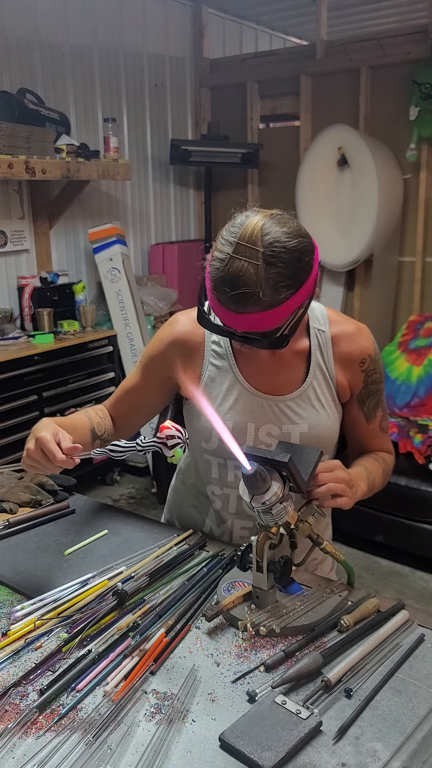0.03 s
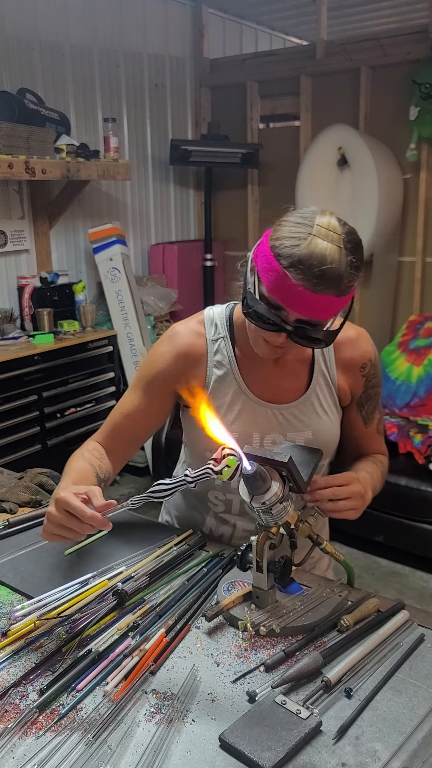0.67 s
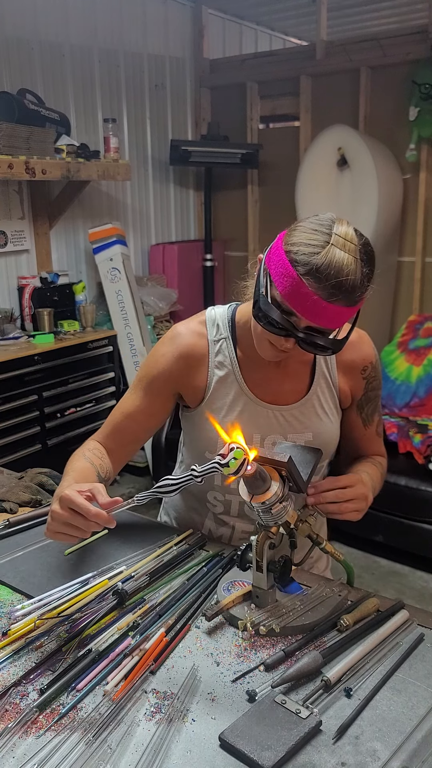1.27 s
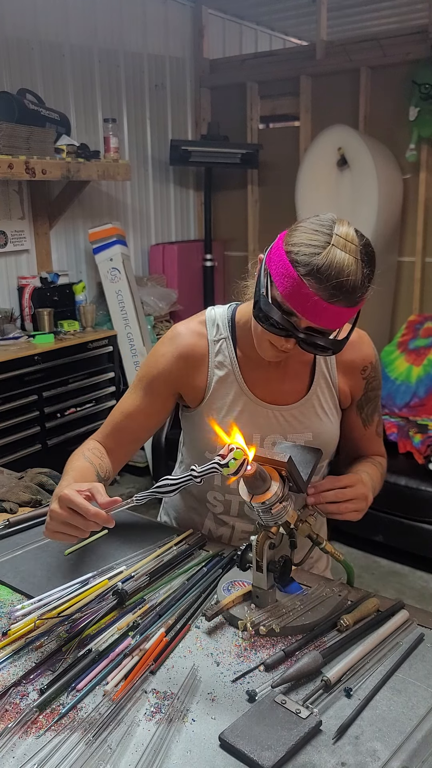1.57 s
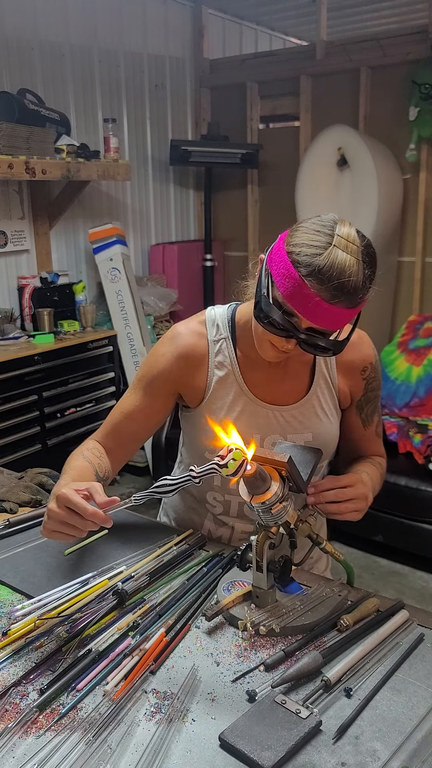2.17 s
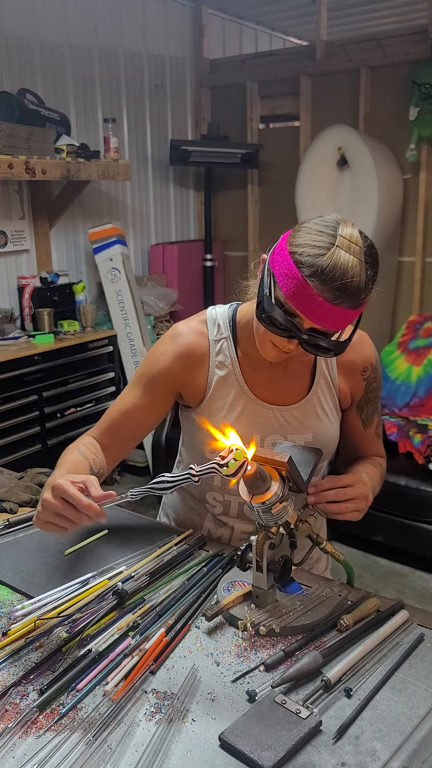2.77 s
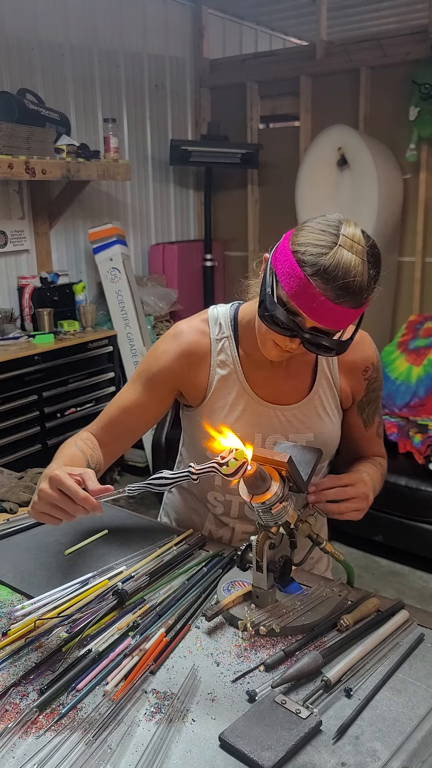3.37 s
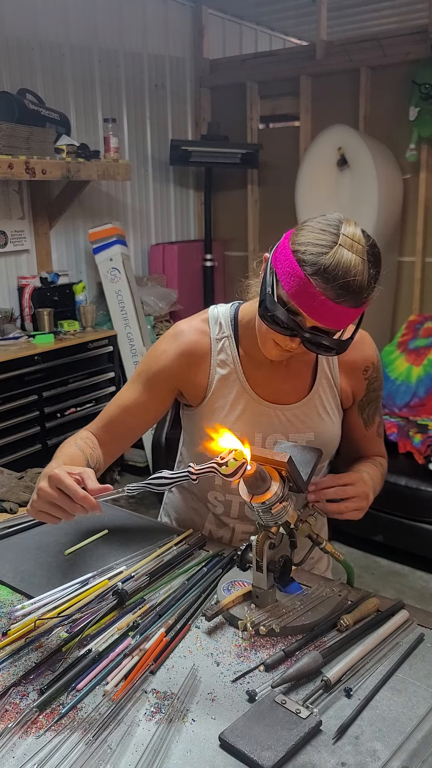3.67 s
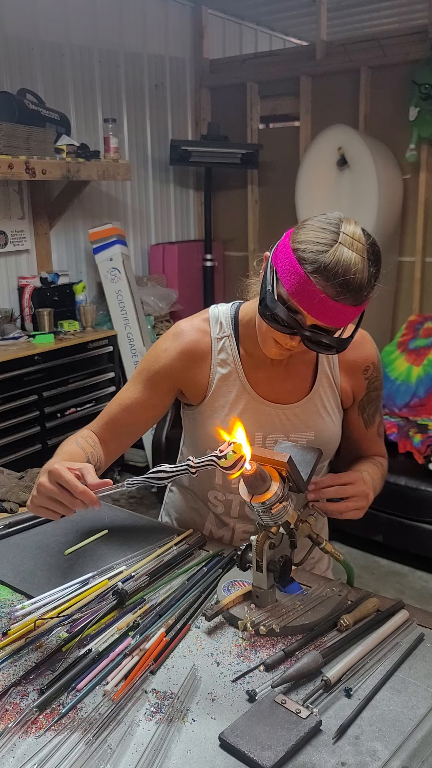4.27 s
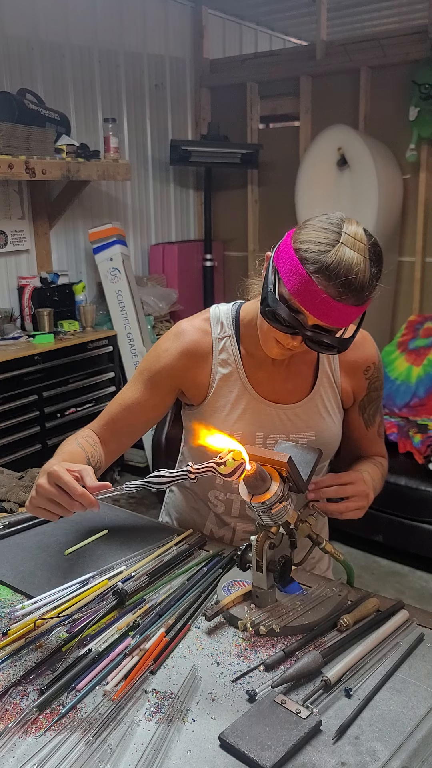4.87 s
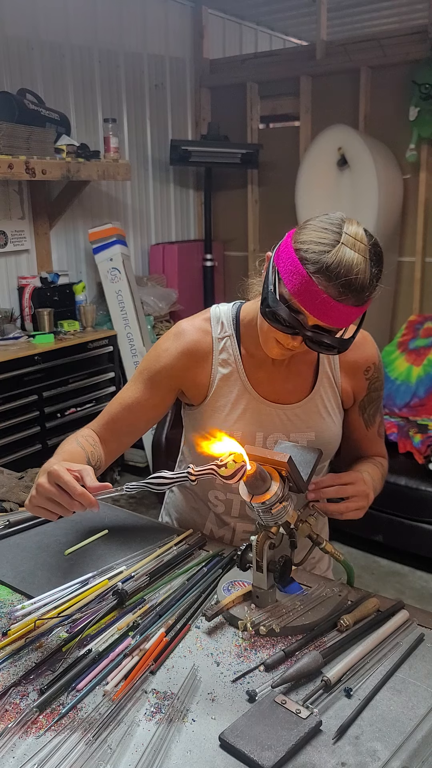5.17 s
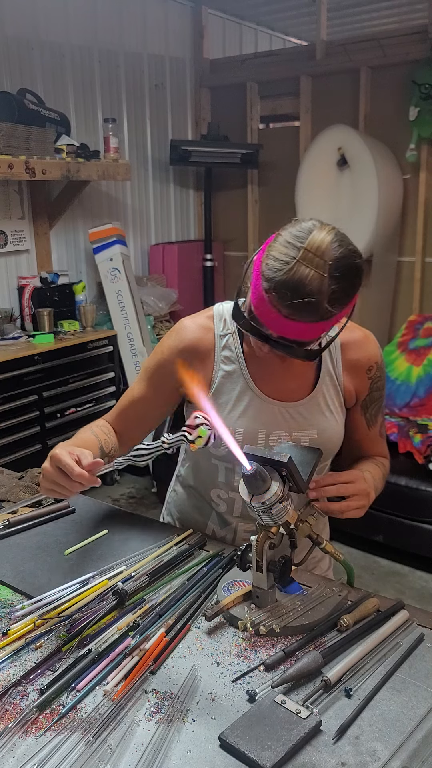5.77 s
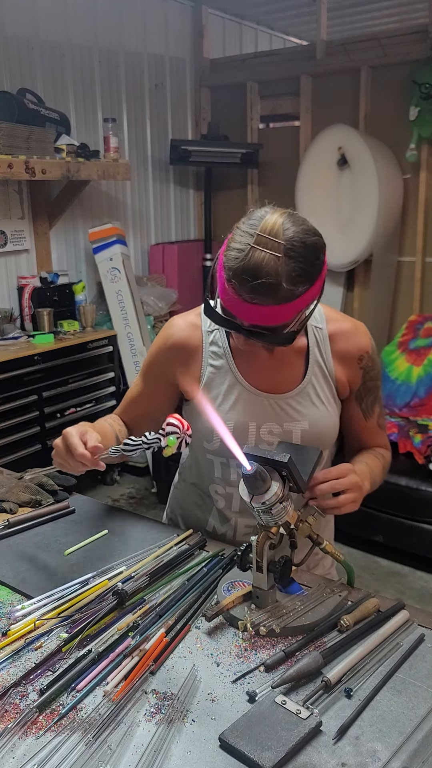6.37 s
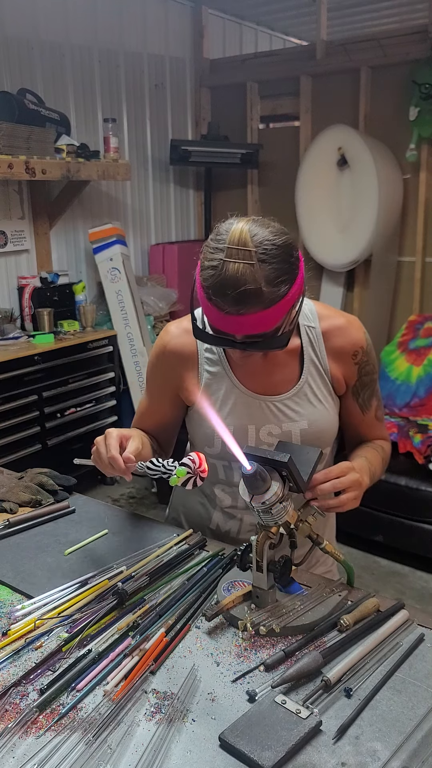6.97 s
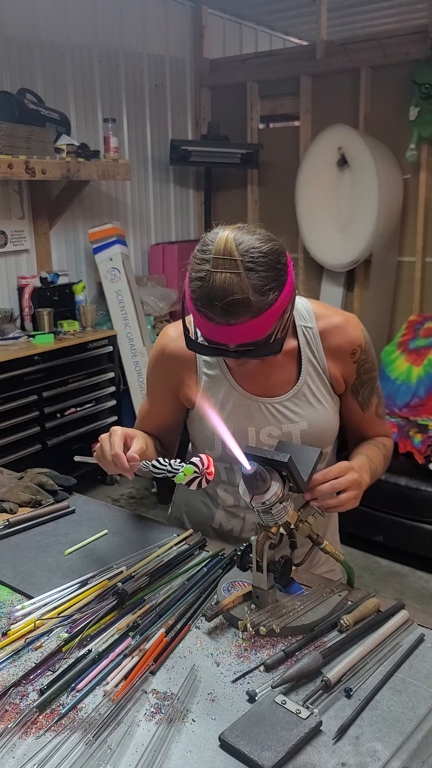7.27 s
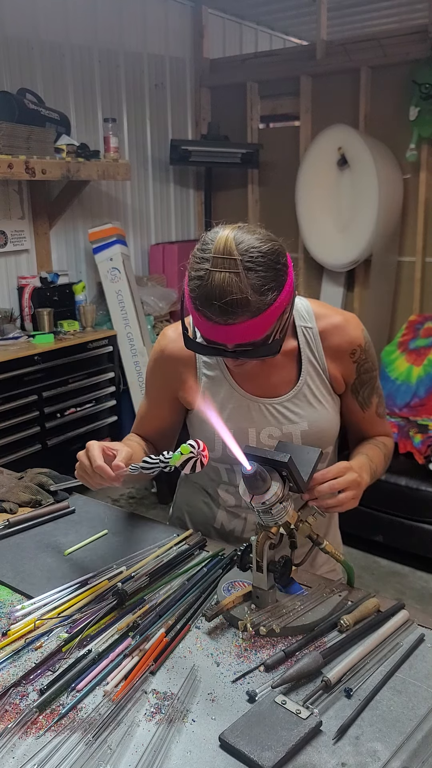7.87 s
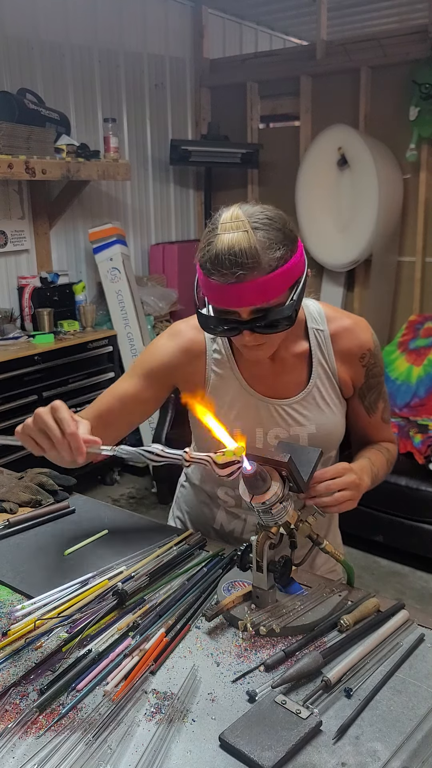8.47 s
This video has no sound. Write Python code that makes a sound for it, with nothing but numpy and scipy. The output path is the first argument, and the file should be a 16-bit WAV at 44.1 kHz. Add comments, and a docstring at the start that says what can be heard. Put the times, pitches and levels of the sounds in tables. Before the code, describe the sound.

Steady gas torch hiss and low roar in a small workshop, dulling as glass is heated, then brightening again over a faint fan hum.

```python
"""A bright hiss over a low roar: a glassworker's torch burns in a small workshop.
The hiss is the rushing gas jet. Glass held in the flame spreads the jet out, so the hiss turns softer
and duller, and the jet whistles breathily on the glass. The roar is the burning gas, which sets the
space round the bench ringing. The flame gives a few tiny spits, ventilation fans hum behind it all,
and there is one soft knock on wood."""
import sys
import numpy as np
from scipy import signal
from scipy.fft import rfft, irfft, next_fast_len
from scipy.io import wavfile
from scipy.ndimage import uniform_filter1d, map_coordinates

SR = 44100
rng = np.random.default_rng(int(sys.argv[2]) if len(sys.argv) > 2 else 0)


def wav_record(signal):
    """Record a signal, one row per channel, as 16-bit PCM in the file named by sys.argv[1]."""
    frames = np.transpose(np.atleast_2d(signal))
    bounded = np.clip(frames, -1, 1)
    # unit amplitude maps onto the largest positive 16-bit level
    quanta = np.round(bounded * 32767).astype(np.int16)
    wavfile.write(sys.argv[1], SR, quanta)


N = 380141


def amp(db):
    """Turn decibels into a number to multiply by."""
    return 10 ** (np.asarray(db) / 20)


def unit(x):
    """Scale a signal so that its average strength (rms) is 1."""
    return x / np.sqrt(np.mean(x ** 2) + 1e-20)


def along(points, hz):
    """Read between (Hz, value) points, with all octaves equally wide."""
    pitches, values = np.transpose(points)
    return np.interp(np.log(hz + 1), np.log(pitches + 1), values)


def curve(rows):
    """Join (seconds, value) rows with straight lines, one value per sample."""
    return np.interp(np.arange(N) / SR, *zip(*rows))


def wobble(rate):
    """A smooth curve through `rate` random values a second."""
    return map_coordinates(rng.standard_normal(int(N * rate / SR) + 4), [np.arange(N) * rate / SR])


def filtered(x, response):
    """Turn each frequency up or down as response(hz) says."""
    size = next_fast_len(N + SR // 2)
    return irfft(rfft(x, size) * response(np.fft.rfftfreq(size, 1 / SR)), size)[..., :N]


def highs(x, above_hz, steepness=8):
    """Keep the part of a sound above a given frequency."""
    return filtered(x, lambda hz: hz ** steepness / (hz ** steepness + above_hz ** steepness))


def rush(colour):
    """The noise of swirling gas, shaped by (Hz, dB) points."""
    return unit(filtered(rng.standard_normal(N), lambda hz: amp(along(colour, hz))))


def resonance(hz, centre, width):
    """How something that rings at one pitch responds to each frequency."""
    return 1j * hz * width / (centre ** 2 - hz ** 2 + 1j * hz * width)


def panned(balance_db):
    """Two gains with constant total power; a positive balance favours the first (left)."""
    gains = amp(balance_db * np.array([[.5], [-.5]]))
    return gains / np.sqrt(np.mean(gains ** 2, axis=0))


def wandering(x, sway_s):
    """A path that slowly lengthens and shortens bends every pitch a little up and down."""
    return map_coordinates(x, [np.arange(N) + sway_s * SR * wobble(2)], order=5, mode="reflect")


def workshop(x, near_t60, near_db, far_t60, far_db):
    """Add near echoes off the bench and far ones off the walls; t60 is the seconds to fade by 60 dB."""
    t = np.arange(SR // 2) / SR
    fades = amp(-60 * t / np.array([near_t60, far_t60])[:, None, None])
    near, far = rng.standard_normal((2, 2, len(t))) * fades
    echoes = amp(near_db) * near / np.linalg.norm(near[0]) + amp(far_db) * far / np.linalg.norm(far[0])
    echoes[:, 0] += 1  # the direct sound
    ripples = rfft(echoes)
    # take out what the two sides share, then even out the broad colour: only fine ripples stay
    broad = lambda v: uniform_filter1d(v, size=110)
    shared = broad(np.real(ripples[1] * ripples[0].conj())) / broad(np.abs(ripples[0]) ** 2)
    ripples[1] -= ripples[0] * shared
    ripples /= np.sqrt(broad(np.abs(ripples) ** 2))
    lead = SR // 100
    response = np.roll(irfft(ripples), lead, axis=1)
    padded = np.pad(x, (len(t), lead), mode="wrap")
    return signal.fftconvolve(padded[None], response, axes=1)[:, len(t) + lead:][:, :N]


def ventilation(drift_rad, waver_db):
    """Two fans turn at slightly different speeds, so they throb over the mains hum."""
    # The two fans and the mains. Each row: pitch in Hz, level in dB.
    motors = [(57.5, -48.5), (61.4, -44.5), (120, -42.5)]
    t = np.arange(N) / SR
    hum = 0
    for hz, db in motors:
        strength = np.sqrt(2) * amp(db + waver_db * wobble(3.8))
        hum += strength * np.sin(2 * np.pi * (hz * t + rng.random()) + drift_rad * wobble(1.8))
    return hum * amp([[-.7], [.7]])  # a little to the right


def knock(t60, contact_db):
    """A light knock makes the wooden bench ring: a firm contact, a short rattle and one rebound."""
    # The knock and its rebound. Each row: start in seconds, strength in dB.
    hits = [(4.432, -19), (4.452, -25)]
    # How the wood rings. Each row: pitch in Hz, width in Hz, relative level in dB.
    wood = [(560, 220, -4), (790, 260, 0), (970, 220, 0), (1330, 220, -3), (1650, 300, -8), (3100, 600, -4)]
    t = np.arange(N) / SR
    rattle_level = sum(amp(db - 60 * np.abs(t - s) / t60) * (t > s) for s, db in hits)
    blow = rng.standard_normal(N) * rattle_level
    for s, db in hits:
        blow[round(s * SR)] += amp(db + contact_db)
    ringing = lambda hz: sum(amp(db) * resonance(hz, centre, width) for centre, width, db in wood)
    return workshop(filtered(blow, ringing), near_t60=0.037, near_db=-4, far_t60=0.25, far_db=-2)


def roar(on_glass, mid_db, side_db, ring_db, calming_db, shortening_db):
    """Burning gas rumbles and rings round the bench; glass shortens the flame and calms its top."""
    # The rumble both ears share. Each row: frequency in Hz, relative level in dB.
    mid_colour = [(25, -21), (50, -7.5), (100, -0.5), (135, -5.5), (175, -13.5), (240, -7), (320, -7.5),
                  (420, -6.5), (540, -18), (720, -13.5), (1000, -26.5), (1200, -11.5), (2000, -23),
                  (3500, -23)]
    # The rumble that is opposite in the two ears. Each row: frequency in Hz, relative level in dB.
    side_colour = [(25, -28), (60, -12), (140, -16), (185, -2), (270, -15), (315, -30), (400, -8),
                   (470, -5.5), (530, 4), (585, -14), (680, 0.5), (750, -5), (825, -1.5), (970, -14),
                   (1330, -4.5), (1550, -11.5), (2200, -32), (3500, -12)]
    # How the space round the bench rings. Each row: pitch in Hz, width in Hz, relative level in dB,
    # phase between left and right in radians.
    bench = [(275, 9.7, -4, 0.65), (387.3, 31.5, -3, -1.6), (639.5, 21, -9, -1.4), (1347, 86, -11.5, 0.87),
             (1547, 13.5, -4, 2.5), (1788, 42, -5.5, 1.9)]
    # Soft flares as the glass meets the flame. Each row: time in seconds, level change in dB.
    flares = [(0, 0.2), (.8, 0.9), (.9, -.5), (2.2, -.1), (3.3, -0.5), (4.5, -.4), (5, 0.24), (7.9, 0),
              (8.15, 1.3), (8.45, 0)]
    sides = np.array([[1], [-1]])  # left, right
    rumble = amp(mid_db) * rush(mid_colour) + sides * amp(side_db) * rush(side_colour)
    ringing = lambda hz: sum(amp(db) * resonance(hz, centre, width) * np.exp(.5j * phase * sides)
                             for centre, width, db, phase in bench)
    pair = rumble + amp(ring_db) * unit(filtered(rng.standard_normal(N), ringing))
    pair += highs(pair, above_hz=480) * (amp(calming_db * on_glass) - 1)
    return pair * amp(curve(flares) + shortening_db * on_glass - 0.23 * sides)


def spits(t60):
    """The flame spits: each spit is a very short, bright crack of noise."""
    # Each row: start in seconds, peak in dB before the room's echoes.
    cracks = [(.347, -15), (5.079, -10), (6.051, -12), (6.266, -12)]
    dry, t = np.zeros(N), np.arange(SR // 100) / SR
    bright = signal.butter(2, [3000, 12000], "bandpass", fs=SR, output="sos")
    for s, db in cracks:
        crack = signal.sosfilt(bright, rng.standard_normal(len(t)) * amp(-60 * t / t60))
        dry[round(s * SR):][:len(t)] += amp(db) * crack / np.abs(crack).max()
    return workshop(dry, near_t60=.03, near_db=-4, far_t60=.25, far_db=-6)


def breathy_tone(centre_hz, width_hz, sway_s):
    """A narrow band of noise whose pitch bends as the glass turns."""
    band = filtered(rng.standard_normal(N), lambda hz: resonance(hz, centre_hz, width_hz) ** 2)
    return wandering(band, sway_s)


def whistle(centre_hz, width_hz, balance_db, flutter_db):
    """The jet whistles on the turning glass, coming and going with the angle."""
    # Each row: time in seconds, level of the whistle in dB.
    loudness = [(.68, -46), (.77, -39), (1.0, -37), (1.15, -31), (1.45, -36), (1.7, -35), (2.4, -36),
                (2.85, -37), (3.22, -37), (3.52, -41), (3.76, -33), (3.9, -38), (4.5, -32.5), (4.85, -39),
                (5.5, -41), (5.7, -65)]
    tone = breathy_tone(centre_hz, width_hz, sway_s=.0012) * amp(flutter_db * wobble(20))
    pair = workshop(tone, near_t60=0.044, near_db=3, far_t60=0.39, far_db=-2)
    return unit(pair) * amp(curve(loudness)) * panned(balance_db)


def rim_tone(centre_hz, width_hz):
    """The jet sings where the rim of the glass cuts it, loudest as the rim enters the flame."""
    # Each row: time in seconds, level of the tone in dB.
    loudness = [(.42, -50), (.47, -42), (.55, -37), (.61, -29.5), (.68, -30), (.73, -46), (1.2, -36.5),
                (3.3, -36), (3.5, -52), (5.6, -60), (5.7, -80)]
    tone = breathy_tone(centre_hz, width_hz, sway_s=.003)
    pair = workshop(tone, near_t60=.04, near_db=3, far_t60=.26, far_db=1)
    return unit(pair) * amp(curve(loudness))


def singing(x, state):
    """Narrow bands stand out or sink in the free jet (state 0) or the spread jet (state 1)."""
    # Each row: pitch in Hz, width in Hz, lift in the free jet in dB, lift on the glass in dB.
    bands = [(3100, 130, -2.5, 2), (4440, 360, 1.5, 6.5), (4810, 130, -1.5, -6), (5295, 200, 6.5, 4),
             (5640, 230, 3, 2.5), (5890, 140, -1, -0.5), (6100, 240, -1.5, 3.5), (6640, 780, 3, -1.5),
             (8734, 290, 7, -8), (10180, 200, 8.5, -6), (10460, 220, -6, 4.5), (10720, 210, 7, -14),
             (11680, 160, 5, 0), (12170, 660, 8, 1.5), (12960, 280, 11.5, 2), (13760, 270, 7, 1)]
    lift_db = lambda hz: sum(lifts[state] * .5 ** ((2 * (hz - centre) / width) ** 2)
                             for centre, width, *lifts in bands)
    return filtered(x, lambda hz: amp(lift_db(hz)))


def shifting(x, depth_db):
    """Bands a few hundred hertz wide slowly come and go."""
    bands = signal.stft(x, nperseg=1024)[2]
    drift = uniform_filter1d(rng.standard_normal(bands.shape), size=7, axis=0)  # smooth across pitch
    drift = uniform_filter1d(drift, size=70, axis=1)  # and across time
    return signal.istft(bands * amp(depth_db * unit(drift)), nperseg=1024)[1][:N]


def fluttering(noise, flutter_db, sputter_db):
    """Swirls shake the flow; the small ones that make the treble flutter on their own."""
    treble = highs(noise, above_hz=4500, steepness=4)
    swirls = lambda: unit(amp(flutter_db * wobble(48) + sputter_db * wobble(190)))
    return (noise - treble) * swirls() + treble * swirls()


def gas_jet(colour, state, sway_s, shift_db, flutter_db):
    """Rushing gas makes a restless noise that echoes round the workshop."""
    jet = singing(rush(colour), state)
    jet = shifting(wandering(jet, sway_s), shift_db)
    jet = fluttering(jet, flutter_db, sputter_db=2.5)
    return unit(workshop(jet, near_t60=0.034, near_db=4.5, far_t60=0.27, far_db=2.0))


def moving_echoes(pair, echo_db, sway_s, count):
    """Hands, glass and body reflect the hiss over paths that slowly change."""
    out = pair.copy()
    for delays_s in rng.uniform(.003, .009, (count, 2)):
        sway = sway_s * wobble(1.212)
        for side, delay in enumerate(delays_s):
            earlier = np.arange(N) - (delay + sway) * SR
            out[side] += amp(echo_db) * map_coordinates(pair[side], [earlier], order=2, mode="reflect")
    return out


def glass_echo(pair, on_glass, echo_db, above_hz):
    """The small glass reflects only the high treble; the echo's delay slides as the glass moves."""
    aside_s, travel_s, hand_sway_s = .0015, .0002, .00003
    treble = highs(pair, above_hz)
    delay = aside_s + travel_s * on_glass + hand_sway_s * wobble(1.4)
    earlier = np.arange(N) - delay * SR
    echo = np.array([map_coordinates(side, [earlier], order=3, mode="reflect") for side in treble])
    return pair - treble + (treble + amp(echo_db) * echo) / np.hypot(1, amp(echo_db))


def placed(pair):
    """Give each band of the hiss its own width and its own place between left and right."""
    # Each row: frequency in Hz, dB by which the shared part (mid) is favoured over the opposite (side).
    narrowness = [(2300, 3.5), (2730, 0), (2950, -15), (3180, 3.5), (4000, 0), (4550, 5.5), (4900, 2.5),
                  (5280, 1.5), (5650, 5), (6150, -1.5), (6700, 0), (7500, 0.5), (8400, 2), (10500, 0),
                  (12000, 5.5), (13300, -5), (14300, 3.5)]
    # Each row: frequency in Hz, dB by which left is favoured over right.
    balance = [(2300, -0.5), (3400, -1.5), (3950, -2.5), (4400, -0.5), (5500, 0.5), (6400, -4.5),
               (7400, 4.5), (8400, 0.5), (9200, 11.5), (10000, -10), (11400, 8), (12300, -7.5),
               (14000, 6.5), (15500, 1.5)]
    mid_side = np.array([pair[0] + pair[1], pair[0] - pair[1]]) / 2
    mid, side = filtered(mid_side, lambda hz: panned(along(narrowness, hz)))
    return filtered(np.array([mid + side, mid - side]), lambda hz: panned(along(balance, hz)))


def grazing(rise_s, fall_s):
    """How many dB the hiss swells as the jet grazes an edge of the glass."""
    # Each row: start in seconds, hold in seconds, level change in dB.
    grazes = [(0.437, 0.063, 2.5), (3.06, 0.23, 1), (3.34, 0.24, -0.4), (4.035, 0.7, 1.25),
              (6.463, 0.65, 1.5), (7.232, 1, 1.3)]
    return sum(curve(zip(start + np.cumsum([0, rise_s, hold, fall_s]), [0, db, db, 0]))
               for start, hold, db in grazes)


def free_sizzle(pair, on_glass, graze_db, steady_db, per_graze_db):
    """The free part of the jet moves power into a high sizzle, more so as it grazes the glass."""
    # Each row: frequency in Hz, share of the extra sizzle from 0 to 1.
    shares = [(4900, 0.068), (5500, 1), (6800, 1), (7400, 0.26), (11000, 0.18)]
    sizzle = filtered(pair, lambda hz: along(shares, hz))
    lift = amp((1 - on_glass) * (steady_db + per_graze_db * graze_db))
    return unit(pair + (lift - 1) * sizzle) / np.sqrt(0.62 + 0.29 * lift ** 2)


def rim_sizzle(pair, on_glass, centre_hz, width_hz, lift_db, share, spread):
    """With only about `share` of the jet on the glass, the rim sharpens one band of the hiss."""
    band = filtered(pair, lambda hz: .5 ** ((2 * (hz - centre_hz) / width_hz) ** 2))
    on_rim = np.exp(-((on_glass - share) / spread) ** 2)
    return pair + band * (amp(lift_db * on_rim) - 1)


def treble_level(pair, above_hz):
    """The top of the hiss slowly dulls and brightens, and is brightest at the very end."""
    # Each row: time in seconds, change of the high treble in dB.
    treble_changes = [(0, -0.5), (1.2, 0.5), (1.9, -0.7), (4.6, -0.9), (5.35, -1.5), (5.7, 0), (6.2, -1.5),
                      (6.5, 1.2), (6.95, 1.3), (7.2, -0.5), (8.3, -.6), (8.5, 2.5)]
    return pair + highs(pair, above_hz) * (amp(curve(treble_changes)) - 1)


def hiss(on_glass, free_db, shield_db):
    """The gas jet hisses; glass in its path spreads it out, making it softer and duller."""
    # The free jet. Each row: frequency in Hz, relative level in dB.
    free_colour = [(700, -19.5), (2300, -12.5), (3150, -2.5), (4000, -3.5), (4850, -3.5), (5400, -5.5),
                   (6800, -3), (7300, -8.5), (8200, -7), (9500, -10), (11300, -10.5), (15700, -10)]
    # The jet spread on the glass. Each row: frequency in Hz, relative level in dB.
    spread_colour = [(700, -28), (2400, -10.5), (3000, -3), (3400, -3.5), (4000, -4.5), (4850, -4),
                     (5400, -2.5), (6800, 0), (7250, -5), (8000, -4.5), (9200, -4.5), (11000, -4.5),
                     (12800, -12.5), (15700, -12)]
    free = gas_jet(free_colour, state=0, sway_s=.0008, shift_db=.7, flutter_db=1.02)
    spread = gas_jet(spread_colour, state=1, sway_s=.0025, shift_db=1.2, flutter_db=0.7)
    pair = np.sqrt(1 - on_glass) * free + np.sqrt(on_glass) * spread
    pair = moving_echoes(pair, echo_db=-13, sway_s=.00009, count=3)
    pair = placed(glass_echo(pair, on_glass, echo_db=-14, above_hz=8500))
    graze_db = grazing(rise_s=0.028, fall_s=0.055)
    pair = free_sizzle(pair, on_glass, graze_db, steady_db=1.5, per_graze_db=1.7)
    pair = rim_sizzle(pair, on_glass, centre_hz=6500, width_hz=880, lift_db=2.5, share=0.39, spread=.22)
    lean_db = 1.05 * on_glass - .6  # the glass throws the hiss a little to the left
    loss_db = shield_db * on_glass ** 0.59  # the first touch of the glass costs the most
    return treble_level(pair, above_hz=7600) * amp(free_db - loss_db + graze_db) * panned(lean_db)


def scene():
    """The torch, with glass moving in and out of its flame, plus the fans and the knock."""
    # Each row: time in seconds, share of the flame that strikes the glass from 0 to 1.
    glass_moves = [(0, 0.5), (.42, 0.35), (.66, 0.32), (.78, 0.4), (1.2, 0.58), (1.7, 0.77), (3.3, 0.7),
                   (3.5, 0.8), (5.59, 0.79), (5.66, 0.18), (6.12, 0.52), (6.43, 0.17), (6.5, 0.14),
                   (7.2, 0.09), (8.2, 0.08), (8.38, 0.22), (8.46, 0.04), (8.62, 0.3)]
    on_glass = np.clip(curve(glass_moves), 0, 1)
    torch = hiss(on_glass, free_db=-18.5, shield_db=6) + spits(t60=0.0039)
    torch += whistle(centre_hz=8400, width_hz=240, balance_db=12, flutter_db=0.5)
    torch += rim_tone(centre_hz=5680, width_hz=420)
    torch += roar(on_glass, mid_db=-35, side_db=-28.2, ring_db=-35, calming_db=-0.5, shortening_db=-1.35)
    bump = knock(t60=0.13, contact_db=22)
    return torch + ventilation(drift_rad=0.32, waver_db=-1.0) + bump


def record(dry):
    """Cut away the very highest treble."""
    return filtered(dry, lambda hz: hz < 15780)


dry = scene()
out = record(dry)
wav_record(out)
```